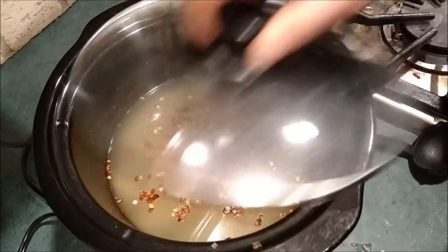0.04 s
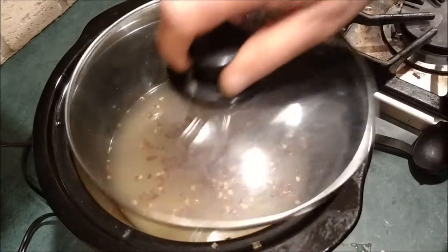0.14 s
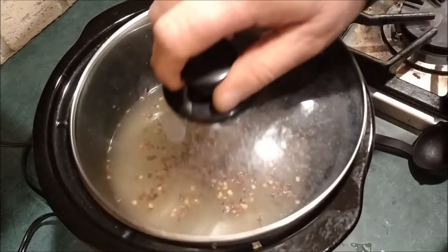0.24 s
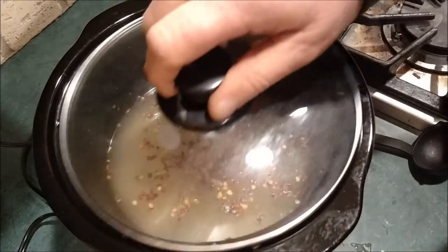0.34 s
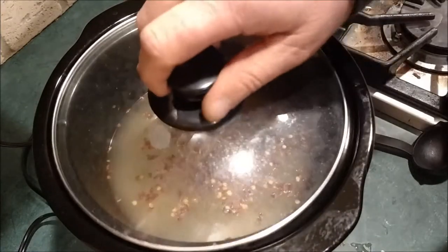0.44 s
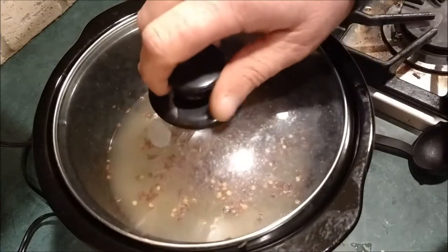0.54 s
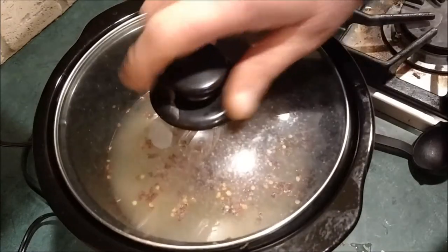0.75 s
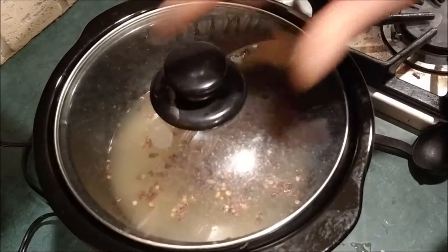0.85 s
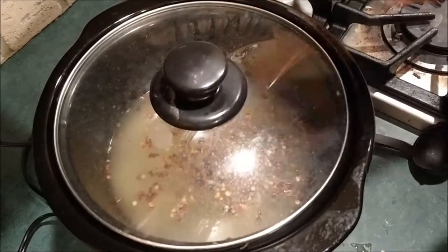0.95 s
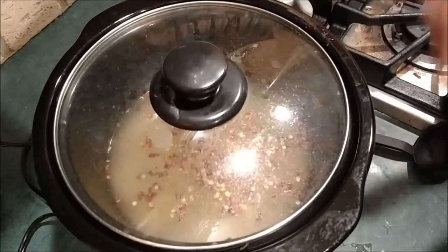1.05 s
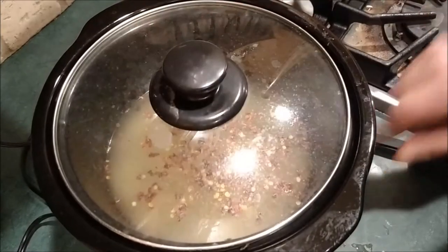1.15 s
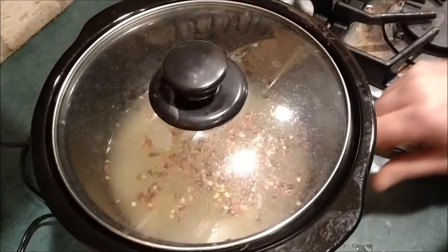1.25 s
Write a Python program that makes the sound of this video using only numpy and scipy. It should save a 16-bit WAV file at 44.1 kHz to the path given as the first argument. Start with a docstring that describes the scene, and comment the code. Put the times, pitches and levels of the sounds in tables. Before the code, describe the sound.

A steel-rimmed glass lid is set down on a slow cooker, close by in a quiet kitchen. It knocks once, chatters with dry, lightly ringing clinks and hollow thumps, then drops into place with a clatter.

```python
"""Glass lid on a slow cooker

A steel-rimmed glass lid is lowered by its knob onto a stoneware crock, close by in a kitchen.
The rim knocks and chatters, then drops into its seat with a clatter. Each contact gives a dry clack,
rings the lid, thumps the cooker and sounds a hollow note that falls as the gap closes.
A faint tone lingers over the room tone."""
import sys
import numpy as np
from scipy import signal
from scipy.fft import rfft, irfft, next_fast_len
from scipy.io import wavfile

SR = 44100
rng = np.random.default_rng(int(sys.argv[2]) if len(sys.argv) > 2 else 0)


def output_pcm(signal):
    """Save a mono or channel-first signal as 16-bit PCM at the path in sys.argv[1].

    Samples are clipped to [-1, 1] before scaling.
    """
    pcm = np.clip(np.atleast_2d(signal).T, -1, 1) * 32767
    wavfile.write(sys.argv[1], SR, np.round(pcm).astype(np.int16))


N = 57330

# Hits of rim on crock: start_s, clack_db, tilt_db_per_octave, ring_db, ring_length_factor,
# hollow_db, thump_db, favoured_hz
RIM_HITS = [ (.2331, -7.5, -3.1, -29.5, .72, -19, -18.5, 600),
            (.2549, -29.5, -9.5, -24, .98, -9.5, -22.5, 580), (.2653, -18, -5, -34, .98, -33.5, -31, 620),
            (.2736, -20, 0.4, -21, .98, -26, -34.5, 1400), (.2801, -18.5, -2.3, -20, .98, -25, -39, 3550),
            (.3427, -19, -1.3, -29.5, .98, -21.5, -30, 5050),
            (.3629, -20.5, -4.7, -32, .98, -24, -42, 1000), (.3743, -16, -2.2, -29.5, .98, -16, -28, 440),
            (.3791, -18.5, -1.1, -28, .98, -40, -62, 3650),
            (.3921, -36.5, 0.2, -28.5, .88, -18.5, -52, 1400),
            (0.4462, -16, -3.65, -31, 1.15, -25, -19.5, 630),
            (.4591, -27.5, -2, -30, 1.25, -20.5, -42, 2330),
            (0.5078, -16.5, -1.2, -29, 1.05, -24, -18.5, 915), (0.5474, -30, -7, -61, .98, -25, -24.5, 540),
            (0.5564, -53, -11, -68, .98, -30.5, -24, 350), (0.5803, -44, -3, -46, .52, -56, -36, 3000),
            (0.5958, -23.5, -0.1, -22.5, .52, -28.5, -18, 1000),
            (0.6021, -11.5, -2.07, -27, .52, -26, -14.5, 780),
            (0.6098, -11.5, -0.44, -21, .52, -23, -18, 1400),
            (.6181, -21.5, 1.5, -44, .52, -37.5, -43, 1480)]
# Tone of steel on stoneware, before each hit's tilt and lift: frequency_hz, gain_db
CLACK_EQ = [(40, -32), (150, -10.5), (300, -11.5), (620, 0.5), (1000, 0.5), (1200, -3.5), (1480, 2.5),
            (2100, -8), (3500, -12.5), (5700, -12.5), (7300, -29), (10500, -38.5), (15000, -44)]
# Modes of the lid, before each hit varies them: pitch_hz, level_db, t60_s
GLASS_MODES = [(910, -9, 0.13), (1366, -1.5, .13), (1412, -1, 0.068), (1770, -14.5, 0.081),
               (2110, -10.5, .14), (2360, -16.5, 0.22), (2817, -16.5, 0.15), (3517, -6, 0.062),
               (3600, -6.5, .12), (4320, -22.5, 0.1), (5055, -8, 0.076), (5970, -21.5, 0.076),
               (7570, -25.5, 0.11), (8550, -27.5, 0.1)]
# The rim's many weak overtones as a noise colour: frequency_hz, gain_db
RIM_EQ = [(250, -14.5), (550, 3), (1500, 2), (2500, 2), (3100, -8), (4100, 0.5), (6000, -13), (7500, -23.5),
          (10000, -34), (12000, -48), (15000, -49)]
# Note of the air under the lid: time_s, pitch_hz
HOLLOW_PITCH = [(.235, 564), (.26, 582), (.3, 622), (.34, 441), (.42, 430.3), (.45, 350), (.49, 342.6),
                (0.548, 381), (.6, 343), (0.621, 237)]
# Modes of the cooker on the counter: pitch_hz, level_db, t60_s
COOKER_MODES = [(92, -9.5, 0.077), (127.6, 1, 0.067), (155, -19.5, .18), (204, -6.5, 0.077)]
# Path of the lingering tone: time_s, pitch_hz, level_db
LINGER_PATH = [(0.619, 1531, -63), (0.699, 1483, -56), (0.781, 1380, -67.5), (0.871, 1260, -66),
               (1.141, 1159, -71.5), (1.26, 1143, -85)]
# Rubs as the lid is carried and let go: peak_s, half_width_s, centre_hz, level_db
HAND_RUBS = [(.03, 0.017, 830, -57), (0.868, 0.021, 2420, -65.5)]
# Reverb time of the kitchen: frequency_hz, t60_s
KITCHEN_DECAY = [(100, 0.59), (450, 0.47), (1500, 0.44), (4000, .42), (8000, 0.18), (15000, 0.25)]
# Colour of the room tone: frequency_hz, gain_db
ROOM_TONE_EQ = [(15, -31.5), (25, -15.5), (122, -4.5), (152, -5.5), (188, -2.5), (305, -11.5), (340, -10.5),
                (389, -11), (523, -14.5), (848, -15.5), (2420, -23.5), (15500, -43)]


def lid_contacts():
    """Every contact clacks, rings the lid, stirs the air beneath it and thumps the cooker."""
    track, thump = np.zeros(N), cooker_thump()
    for start_s, clack_db, tilt, ring_db, length, hollow_db, thump_db, favoured_hz in RIM_HITS:
        add(track, start_s, amp(clack_db) * clack(tilt, favoured_hz))
        add(track, start_s, amp(ring_db) * lid_ring(length, favoured_hz))
        add(track, start_s, amp(hollow_db) * hollow_note(start_s))
        add(track, start_s, amp(thump_db) * thump)
    return track


def clack(tilt_db_per_octave, favoured_hz, t60_s=.031, crack_db=-8.5):
    """Steel on stoneware: one sharp crack and a dry scatter behind it."""
    def eq(hz):
        tilt_db = tilt_db_per_octave * np.log2(np.maximum(hz, 300) / 1000)
        return amp(along(CLACK_EQ, hz) + contact_lift_db(hz, favoured_hz) + tilt_db)

    envelope = decay(clock(), t60_s)
    strength = np.linalg.norm(envelope)
    blow = rng.standard_normal(N) * envelope
    blow[0] = -amp(crack_db) * strength
    sound = minimum_phase(blow, eq)
    return sound * strength / np.linalg.norm(sound)


def lid_ring(length, favoured_hz, rim_db=-7.5, rim_t60_s=.13, rise_s=.0012, scatter_db=2.5, detune=.003):
    """The lid's modes, struck a little differently each time, over the rim's weak overtones."""
    ring = amp(rim_db) * noise(RIM_EQ) * fade(rim_t60_s * length, rise_s)
    variations = rng.standard_normal((len(GLASS_MODES), 3))
    for (hz, db, t60_s), (louder, sharper, start_cycles) in zip(GLASS_MODES, variations):
        pitch_hz = hz * (1 + detune * sharper) + waver()
        cycles = start_cycles + np.cumsum(pitch_hz) / SR
        level = amp(db + contact_lift_db(hz, favoured_hz) + scatter_db * louder)
        ring += level * fade(t60_s * length, rise_s) * np.sin(2 * np.pi * cycles)
    return ring


def contact_lift_db(hz, favoured_hz, peak_db=7, width_octaves=.13):
    """Each point of the rim brings out one narrow range of the lid's sound."""
    return peak_db * bell(hz, favoured_hz, width_octaves)


def waver(depth_hz=13.5, knots_per_s=109.5):
    """A mode's pitch wavers at random as the rim rolls and the grip shifts."""
    knots = rng.standard_normal(400)
    return depth_hz * np.interp(clock() * knots_per_s, np.arange(len(knots)), knots)


def hollow_note(start_s):
    """The air under the lid rings at the pitch that the gap allows."""
    hz = np.interp(start_s + clock(), *np.transpose(HOLLOW_PITCH))
    return -np.sin(2 * np.pi * np.cumsum(hz) / SR) * fade(t60_s=.11, rise_s=.0011)


def cooker_thump():
    """The cooker's body gives under a blow and adds the low end."""
    return sum(amp(db) * fade(t60_s, rise_s=.0035) * np.sin(2 * np.pi * hz * clock())
               for hz, db, t60_s in COOKER_MODES)


def lingering_tone(width_hz=22):
    """A faint, fuzzy tone sinks in pitch once the lid is seated."""
    times, hz, db = np.transpose(LINGER_PATH)
    t = clock()
    phase = 2 * np.pi * np.cumsum(np.interp(t, times, hz)) / SR
    fuzz = [filtered(rng.standard_normal(N), lambda f: 1 / (1 + (f / width_hz) ** 2)) for _ in range(2)]
    tone = unit(fuzz[0] * np.cos(phase) + fuzz[1] * np.sin(phase))
    return tone * amp(np.interp(t, times, db)) * (t > times[0])


def hand_rubs(width_octaves=.47):
    """Soft swells of friction noise from the hand on the lid."""
    track = np.zeros(N)
    for peak_s, half_width_s, centre_hz, db in HAND_RUBS:
        friction = unit(filtered(rng.standard_normal(N), lambda hz: bell(hz, centre_hz, width_octaves)))
        swell = np.exp(-((clock() - peak_s) / half_width_s) ** 2)
        track += amp(db) * friction * swell
    return track


def kitchen_reverb(x, echoes_db=-12.5, near_s=.0017, far_s=.022, tail_db=-18, predelay_s=.008):
    """Early echoes from counter and walls, then a short diffuse tail."""
    hz, t, spectra = signal.stft(rng.standard_normal(N), SR, nperseg=256)
    spectra *= decay(t, along(KITCHEN_DECAY, hz)[:, None])
    tail = signal.istft(spectra, SR, nperseg=256)[1][:N]
    delays_s = rng.uniform(near_s, far_s, size=8)
    echoes = np.bincount((delays_s * SR).astype(int), rng.standard_normal(len(delays_s)), N)
    response = amp(echoes_db) * echoes / np.linalg.norm(echoes)
    add(response, predelay_s, amp(tail_db) * tail / np.linalg.norm(tail))
    return signal.fftconvolve(x, response)[:N]


def room_tone(level_db=-59):
    """A steady, dark bed of noise."""
    return amp(level_db) * noise(ROOM_TONE_EQ)


def amp(db):
    return 10 ** (np.asarray(db) / 20)


def unit(x):
    return x / np.sqrt(np.mean(x ** 2) + 1e-20)


def clock():
    return np.arange(N) / SR


def decay(t, t60_s):
    return np.exp(-np.log(1000) * t / t60_s)


def fade(t60_s, rise_s):
    """A quick attack and an exponential decay."""
    return decay(clock(), t60_s) * (1 - np.exp(-clock() / rise_s))


def bell(hz, centre_hz, width_octaves):
    return np.exp(-.5 * (np.log2((hz + 1) / centre_hz) / width_octaves) ** 2)


def along(points, hz):
    """Read a curve on a log frequency axis."""
    frequencies, values = np.transpose(points)
    return np.interp(np.log(hz + 1), np.log(frequencies + 1), values)


def filtered(x, gain):
    """Zero-phase EQ by a gain of frequency."""
    size = next_fast_len(len(x) + 8192)
    return irfft(rfft(x, size) * gain(np.fft.rfftfreq(size, 1 / SR)), size)[:len(x)]


def minimum_phase(x, gain):
    """EQ that keeps the attack clean, with no sound before the blow."""
    size = 2 * next_fast_len(N, real=True)
    gains = np.maximum(gain(np.fft.rfftfreq(size, 1 / SR)), 1e-6)
    cepstrum = irfft(np.log(gains), size)
    cepstrum[1:size // 2] *= 2
    cepstrum[size // 2 + 1:] = 0
    return irfft(rfft(x, size) * np.exp(rfft(cepstrum)), size)[:N]


def noise(eq):
    """Noise of rms 1 in the given colour."""
    return unit(filtered(rng.standard_normal(N), lambda hz: amp(along(eq, hz))))


def add(track, start_s, sound):
    start = round(start_s * SR)
    track[start:] += sound[:N - start]


def scene():
    """The lid up front, with its reverb and the quiet layers behind, in mono."""
    lid = lid_contacts()
    return (lid + kitchen_reverb(lid) + hand_rubs() + lingering_tone() + room_tone())[None]


def record(dry, low_cut_hz=63, top_hz=15900):
    """The microphone thins the deep bass; a steep high cut takes off the very top."""
    low_cut = signal.butter(2, low_cut_hz, "highpass", fs=SR, output="sos")
    thinned = signal.sosfilt(low_cut, dry[0])
    return filtered(thinned, lambda hz: hz < top_hz)[None]


dry = scene()
out = record(dry)
output_pcm(out)
```